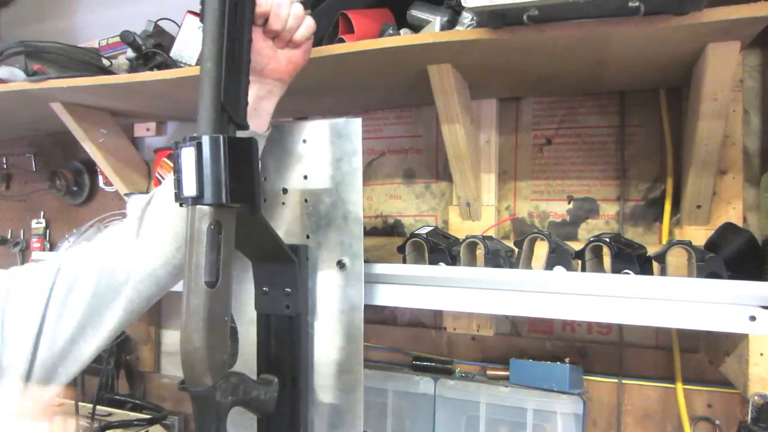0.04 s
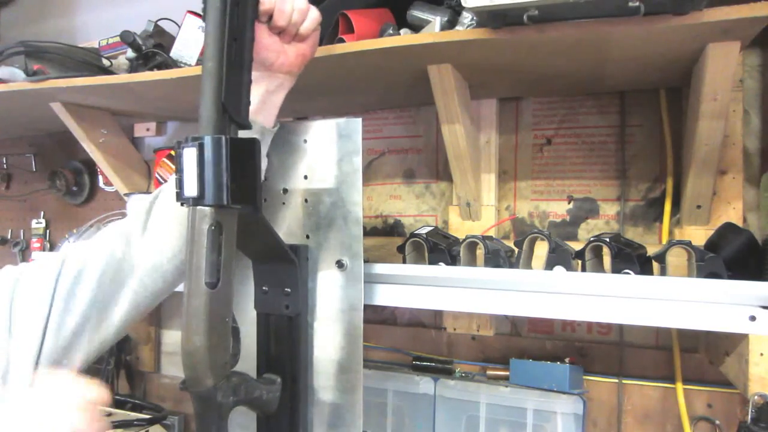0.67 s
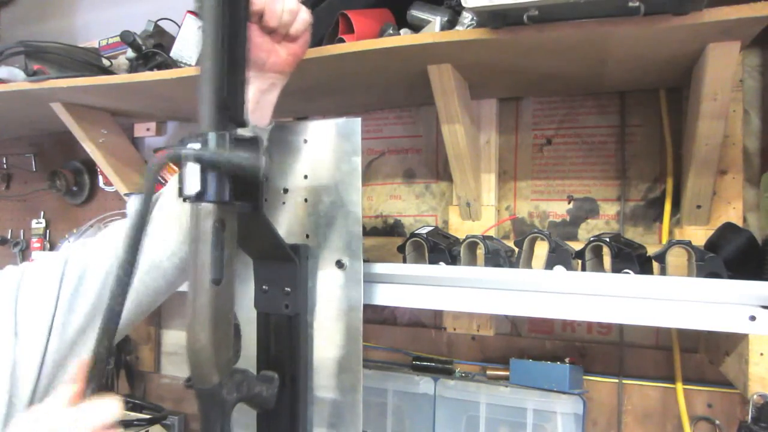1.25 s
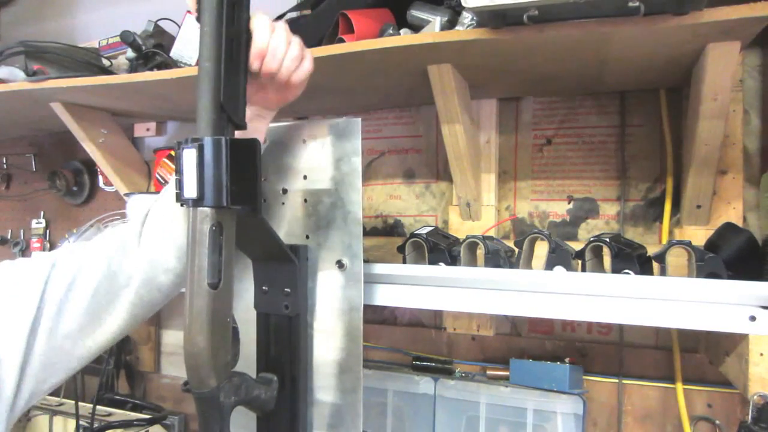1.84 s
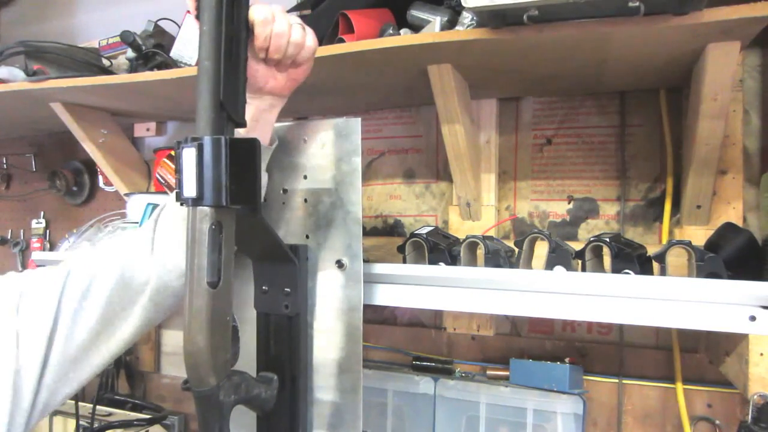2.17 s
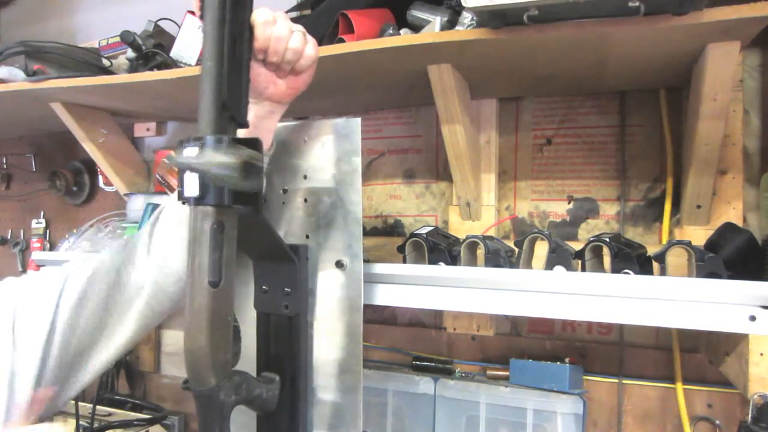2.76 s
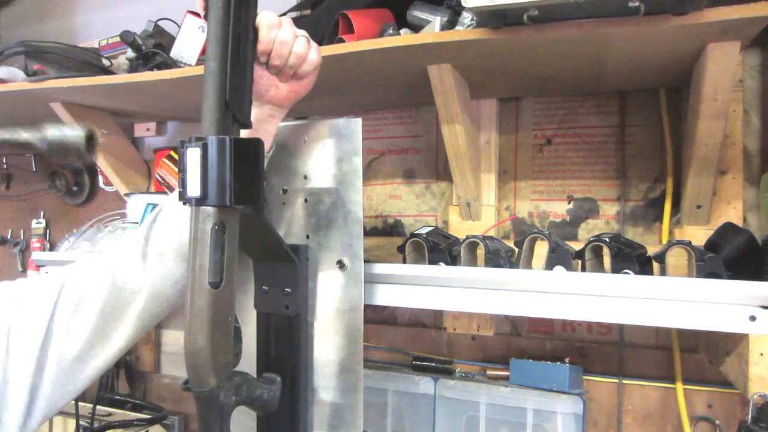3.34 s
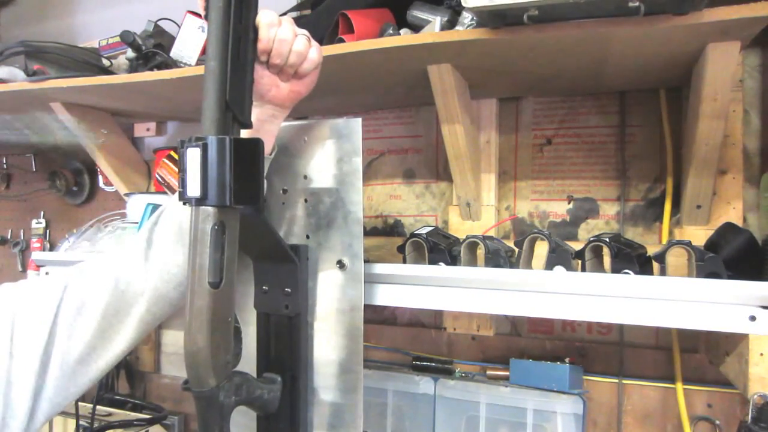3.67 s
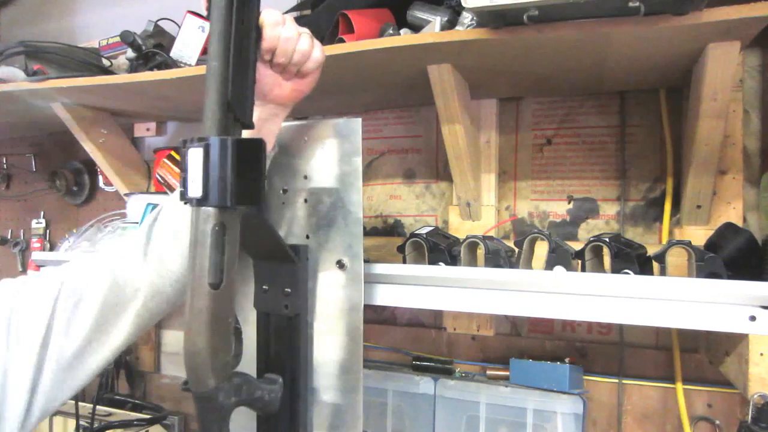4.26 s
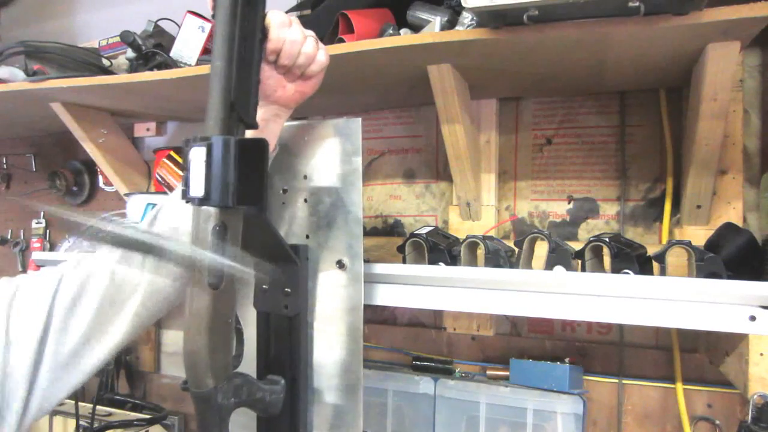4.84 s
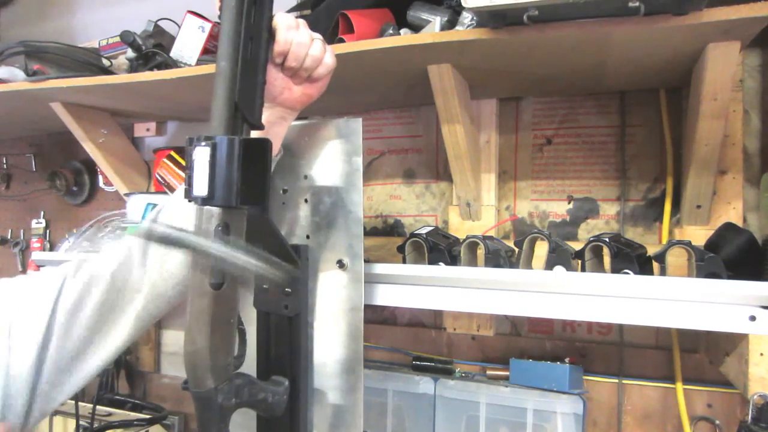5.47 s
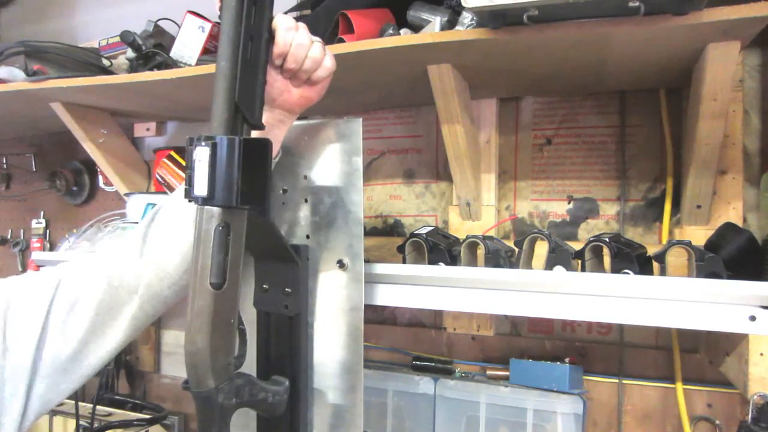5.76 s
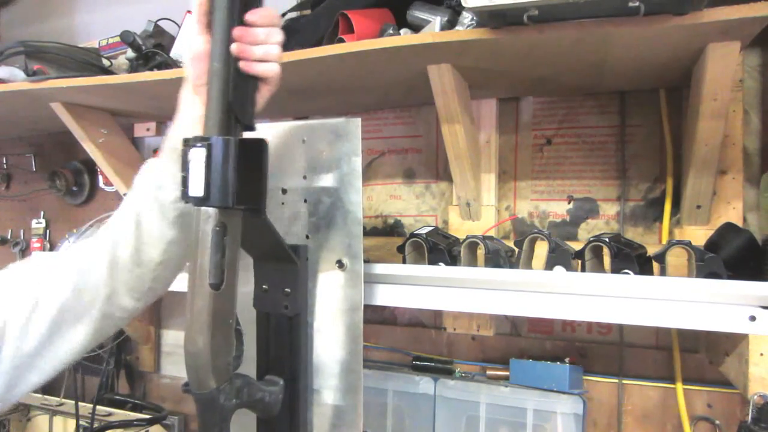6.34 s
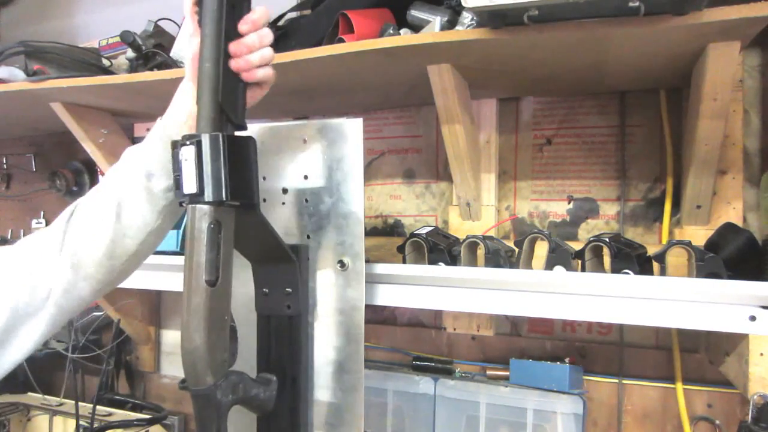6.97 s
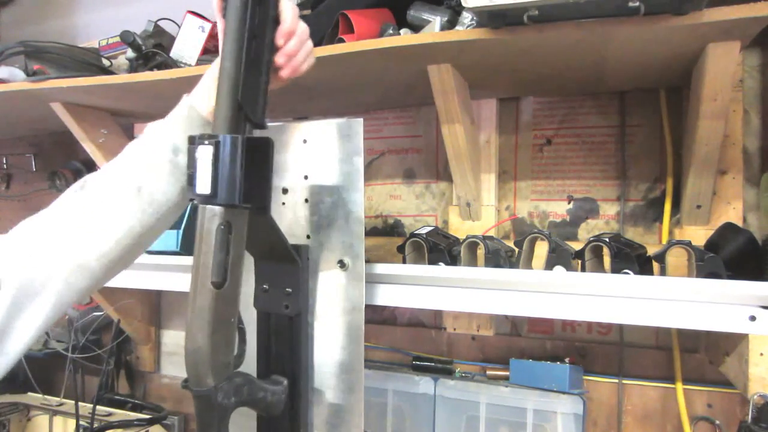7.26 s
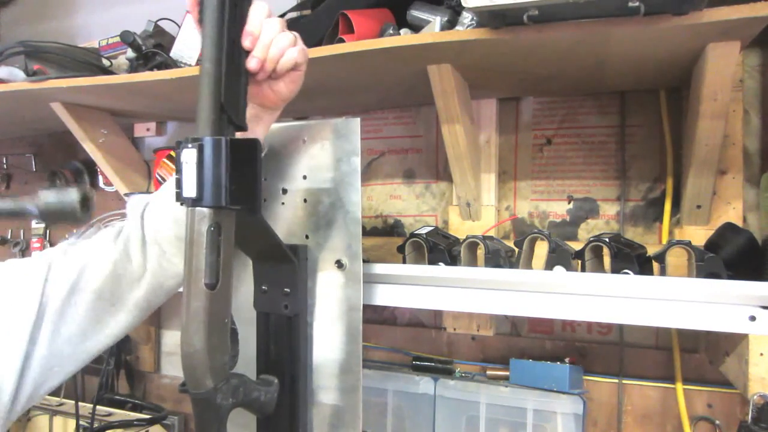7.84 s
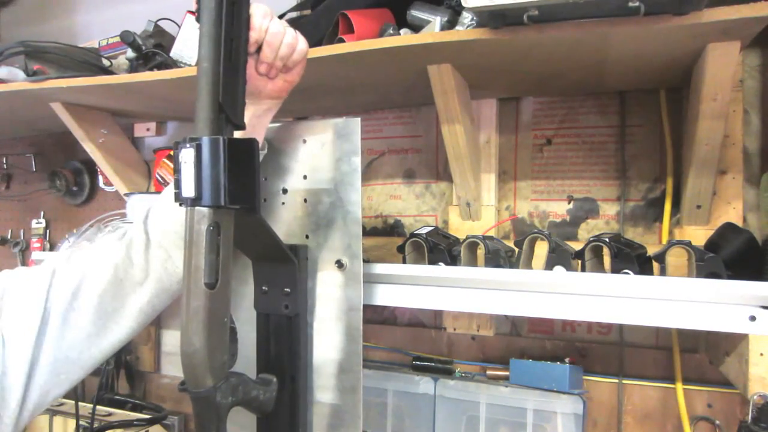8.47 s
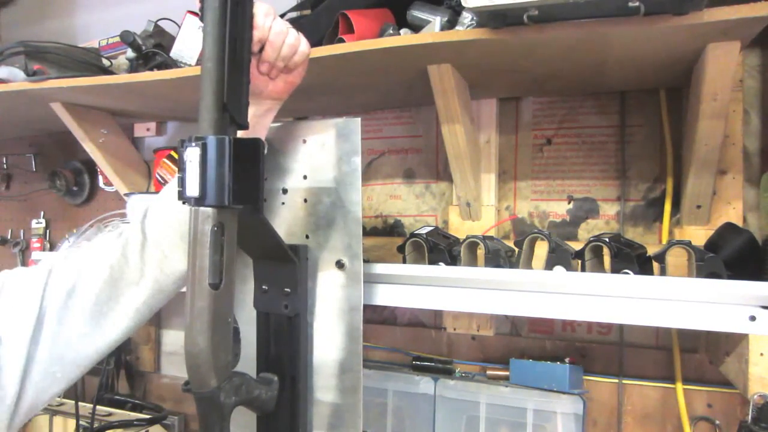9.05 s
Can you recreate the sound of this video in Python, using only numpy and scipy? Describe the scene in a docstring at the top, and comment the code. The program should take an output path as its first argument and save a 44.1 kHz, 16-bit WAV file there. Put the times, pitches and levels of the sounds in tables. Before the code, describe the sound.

A steel bar strikes a metal lock on a gun eight times, with sharp clangs, rattles and quiet handling in a small workshop.

```python
"""Hammering a gun lock

A steel bar strikes a lock clamped round a gun, eight times, close to a camera in a small workshop.
Each blow cracks, clangs through lock and mount and shakes the wall; then the gun chatters in its clamp.
A hand shifts its grip between blows, and a fan hums. The camera's automatic volume control turns
everything down at loud blows and lets the room's hum creep back."""
import sys
import numpy as np
from scipy import signal
from scipy.fft import rfft, irfft
from scipy.io import wavfile
from scipy.ndimage import uniform_filter1d, minimum_filter1d

SR = 44100
rng = np.random.default_rng(int(sys.argv[2]) if len(sys.argv) > 2 else 0)


def transcribe(u):
    """Save the signal u as a 16-bit wav file named by the first command-line argument.

    u: samples, shape (n,) or (channels, n), limited to [-1, 1]; the rate is SR.
    q: integer samples, one column per channel.
    """
    v = np.clip(np.atleast_2d(u).T, -1, 1)
    q = np.round(v * 32767).astype(np.int16)
    wavfile.write(sys.argv[1], SR, q)


N = 406161
T = np.arange(SR) / SR  # one second of time, for each short sound

# A TONE table gives the balance of low and high pitches. fade_s is the time to die away by 60 dB.
# blows of the bar: start_s, force_db, thud_db, body_db, chatter_db, rebound_after_s, rebound_db
BAR_BLOWS = [(-0.019, 3.5, 4, 2, -2.5, .014, -8), (0.5754, -0.8, 2, 4, 2, .012, -7),
             (1.1698, -1.3, 8.5, 1.5, 2.5, .017, -1), (2.5456, -1.5, 1.5, 3.5, -4, .012, -5),
             (4.0439, -1.2, 5, -3.5, -8.5, .014, -13), (4.5855, -1.5, 3, 3, -1, .017, -9),
             (5.2122, -1.3, 2.5, 0, -1.2, .016, -9), (8.6998, 0.5, -7, 1, -4, .010, -3)]
# splash of noise as the bar meets the lock: pitch_hz, level_db
CRACK_TONE = [(60, -16), (300, -16), (1000, -9.5), (1500, -5), (2000, -8), (2800, -5), (3500, -12.5),
              (4700, -8.5), (5500, -20), (6300, -8), (7800, -7.5), (9800, -16), (12000, -34)]
# stiff, short-lived notes of that first contact: pitch_hz, level_db, fade_s
CRACK_NOTES = [(527, -12.5, .05), (1573, 1, 0.032), (2510, -8, 0.036)]
# dense ring of gun, mount and bench: pitch_hz, level_db
CLANG_TONE = [(30, -15), (110, -13.5), (280, -5), (480, -1.5), (900, -0.5), (1250, -1), (1550, 1),
              (2100, -4.5), (2600, -3.5), (3600, -8), (7500, -9), (9500, -15.5), (11000, -30.5),
              (12000, -31.5)]
# how long that ring lasts: pitch_hz, fade_s
CLANG_FADES = [(60, .25), (500, 0.23), (1500, .2), (4000, .2), (11000, 0.14)]
# strongest notes of lock and mount: pitch_hz, level_db
STEEL_NOTES = [(451, -3), (482, -5), (581, -2.5), (749, -5), (842, -5), (898, -0.5), (973, -6.5),
               (1015, -6.5), (1189, -5), (1422, 2), (1478, -1), (1547, -2.5), (1595, -2), (1655, -4.5),
               (1715, -2), (1895, -5.5), (2138, -7.5), (2445, -4.5), (2475, -2), (2623, -5), (3007, -5),
               (3455, -8.5), (5200, -10), (6110, -10)]
# faint, lasting ring of the bar: pitch_hz, level_db, fade_s
BAR_NOTES = [(1830, 0, 1.6), (3540, -3, 1.2), (5373, -7, 0.83), (6815, -9.5, 0.79), (7100, -9, 0.9),
             (8511, -12.5, 1.6), (9100, -12, 1.1), (11280, -10.5, .6)]
# the wall shaken through the mount: pitch_hz, level_db
THUD_TONE = [(15, -8.5), (35, -0.5), (65, 0), (110, -3.5), (200, -6), (300, -17), (800, -40), (3000, -70.5)]
# the workshop's echo: pitch_hz, level_db
ECHO_TONE = [(30, -13), (100, -13.5), (200, -3), (300, -9), (1200, -7.5), (1600, 0.5), (2700, 1.5),
             (4200, -6.5), (6500, -5), (10000, -13), (12000, -30)]
# how long that echo lasts: pitch_hz, fade_s
ECHO_FADES = [(50, 1), (190, 0.58), (350, 0.39), (1000, 0.17), (3000, 0.43), (7000, 0.37), (11000, .31)]
# the gun chattering in its clamp: pitch_hz, level_db
CHATTER_TONE = [(100, -20), (450, -10.5), (850, -6), (1230, -14), (1450, 1.5), (1750, -1), (2100, -4),
                (2480, -2), (3300, -10.5), (6000, -11), (8000, -13.5), (9800, -17.5), (11200, -30),
                (12000, -33)]
# the hand knocks on the gun: start_s, level_db, pitch_hz
HAND_KNOCKS = [(1.556, -44, 1280), (6.213, -44.5, 1250), (6.315, -30.5, 900), (6.385, -38, 780),
               (6.417, -36, 800), (6.848, -34, 620), (7.17, -39.5, 850)]
# loose metal parts click: start_s, level_db, pitch_hz
METAL_CLICKS = [(0.528, -51, 3500), (2.035, -38.5, 3400), (4.915, -49, 3500), (6.314, -41, 2900),
                (6.414, -42, 6500), (7.06, -42.5, 4000), (7.089, -45, 6000), (7.204, -41, 3000),
                (7.352, -45.5, 2800), (7.515, -55, 6400), (7.921, -53, 2300)]
# the gun's weight bumps the mount against the wall: start_s, level_db
WALL_BUMPS = [(0.128, -24), (6.392, -37), (6.86, -43), (7.421, -43)]
# the mount creaks: start_s, length_s, pitch_hz, level_db
MOUNT_CREAKS = [(2.739, 0.034, 500, -35), (2.771, 0.029, 420, -36), (4.238, 0.034, 955, -50),
                (5.398, .04, 476, -36.5)]
# strokes of the hand along the gun: middle_s, length_s, level_db
HAND_STROKES = [(1.6, .4, -64), (3.3, 1.4, -68), (6.40, .16, -45.5), (7.14, .34, -54.5), (7.48, .4, -64)]
# skin and sleeve rubbing on the gun: pitch_hz, level_db
RUB_TONE = [(100, -6), (400, -3), (900, 3.5), (2000, 4.5), (4000, -2), (8000, -4), (10000, -14.5),
            (12000, -24)]
# the fan's hum: pitch_hz, level_db
HUM_NOTES = [(70, -55.5), (150, -58.5), (333, -62), (657, -66), (845, -69), (1039, -72), (1357, -71)]
# the fan's steady rush of air: pitch_hz, level_db
AIR_TONE = [(15, -7), (45, -9), (100, -8.5), (140, -3.5), (250, -3), (325, 6.5), (380, -4.5), (560, -1),
            (760, -7), (1350, -9), (2100, -13), (4000, -28.5), (7500, -35.5), (11500, -49)]


def hammering(spring_s=.0655, spring_s_per_db=.0009):
    """All the blows. The harder the gun springs back, the later it meets its clamp."""
    out = np.zeros(N)
    for start_s, force_db, thud_db, body_db, chatter_db, rebound_after_s, rebound_db in BAR_BLOWS:
        strike = blow(thud_db, body_db)
        rattle = amp(chatter_db) * chatter(spring_s + spring_s_per_db * chatter_db)
        add(out, start_s, amp(force_db) * (strike + rattle))
        add(out, start_s + rebound_after_s, amp(force_db + rebound_db) * rebound())
    return out


def blow(thud_db, body_db):
    """One blow: a crack, then a clang that spreads through the mount into wall and room."""
    clang = amp(-2) * fade_by_pitch(noise(CLANG_TONE), CLANG_FADES) * onset(.0016) * flicker(1.5)
    notes = amp(-3.5) * steel_ring(lowest_hz=295, scatter_db=3) * onset(.0012) * fade(.165)
    thud = amp(thud_db - 16.5) * noise(THUD_TONE) * onset(.002) * (fade(.17) + amp(-21.5) * fade(.9))
    echo = amp(-10.5) * fade_by_pitch(noise(ECHO_TONE), ECHO_FADES) * onset(.015) * flicker(.7)
    bar = sum(amp(db + rng.normal(0, 2)) * sine(hz) * fade(fade_s) for hz, db, fade_s in BAR_NOTES)
    ring = crack() + clang + notes + echo + amp(-55) * bar
    # body_db turns the lower pitches up or down
    tilt_db = np.interp(np.fft.rfftfreq(len(T), 1 / SR), [600, 1400], [body_db, 0])
    ring = irfft(rfft(ring) * amp(tilt_db), len(T))
    soft_end = np.minimum(1, 2 * (1 - T)) ** 2
    return (ring + thud) * soft_end


def crack():
    """Steel meets steel: the lock is pushed off sharply and rings for an instant."""
    push = sum(amp(db) * np.sin(2 * np.pi * hz * rng.uniform(.99, 1.02) * T) * fade(fade_s)
               for hz, db, fade_s in CRACK_NOTES)
    splash = amp(1) * noise(CRACK_TONE) * fade(.035)
    return (amp(3.5) * push + splash) * onset(.00061)


def steel_ring(lowest_hz, scatter_db):
    """Lock and mount ring at their own notes; each contact shifts the levels and pitches a little."""
    ring = np.zeros(len(T))
    for hz, db in STEEL_NOTES:
        note = amp(db + rng.normal(0, scatter_db)) * sine(hz * rng.normal(1, .004))
        ring += note / (1 + (lowest_hz / hz) ** 4)  # weakens notes below lowest_hz
    return unit_level(ring)


def rebound():
    """The bar lands again as it skids off the lock."""
    return amp(-7) * crack() + noise(CLANG_TONE) * onset(.001) * fade(.045)


def chatter(delay_s):
    """The gun springs back against its clamp: a buzz of contacts that swells and dies."""
    rise = np.exp(-((T - delay_s) / .016) ** 2)
    fall = fade(.21, np.maximum(T - delay_s - .014, 0))
    swell = np.where(T < delay_s, rise, fall) * flicker(1.6)
    buzz = amp(-10.5) * noise(CHATTER_TONE)
    ring = amp(-16) * steel_ring(lowest_hz=1000, scatter_db=4)
    return swell * (buzz + ring)


def taps(rows, width_octaves, fade_s):
    """Small contacts on the gun: each rings briefly round its pitch, with a little echo after it."""
    out, grid_hz = np.zeros(N), np.geomspace(20, 16000, 40)
    treble_cut_db = 10 * np.log10(1 + (grid_hz / 9500) ** 16)
    decay = fade(fade_s) + amp(-24) * fade(.13)
    for start_s, db, hz in rows:
        hump_db = -14 * np.log10(1 + (np.log2(grid_hz / hz) / width_octaves) ** 4)
        ring = noise(np.c_[grid_hz, hump_db - treble_cut_db])
        add(out, start_s, amp(db) * ring * onset(.00062) * decay)
    return out


def mount_settling():
    """The mount bumps the wall and creaks as it settles."""
    out = np.zeros(N)
    for start_s, db in WALL_BUMPS:
        add(out, start_s, amp(db) * noise(THUD_TONE) * onset(.004) * fade(.35))
    for start_s, length_s, hz, db in MOUNT_CREAKS:
        creak = sine(hz) + .66 * noise([(100, -20), (hz, 0), (3000, -30), (12000, -70)])
        swell = np.exp(-(2 * T / length_s - 1) ** 2)
        add(out, start_s, amp(db) * unit_level(creak) * swell)
    return out


def hand_rubbing(grains_per_s=6000, ends_db=-15, sleeve_db=-73):
    """Skin rubs on the gun in grainy strokes that swell and die away; a sleeve rustles all the time."""
    t = np.arange(N) / SR
    grains = rng.standard_normal(N) * (rng.random(N) < grains_per_s / SR)
    strokes = sum(amp(db + ends_db * abs(t - middle_s) / (length_s / 2))
                  for middle_s, length_s, db in HAND_STROKES)
    return shape_tone(grains, RUB_TONE) * np.hypot(strokes, amp(sleeve_db))


def fan(air_db=-48):
    """A fan's rush of air and its hum; the higher notes waver more."""
    t = np.arange(N) / SR
    hum = np.zeros(N)
    for hz, db in HUM_NOTES:
        waver = shape_tone(rng.standard_normal(N), [(1, 0), (4, -8), (30, -60), (200, -120)])
        hum += amp(db) * np.sqrt(2) * np.sin(2 * np.pi * hz * t + min(hz / 450, 1.2) * waver)
    return amp(air_db) * shape_tone(rng.standard_normal(N), AIR_TONE) + hum


def flicker(depth_db):
    """A level that jumps about within a few milliseconds, as loose parts meet and part."""
    wobble = uniform_filter1d(uniform_filter1d(rng.standard_normal(len(T)), size=170), size=110)
    return unit_level(amp(depth_db * unit_level(wobble)))


def noise(tone):
    """One second of noise with the given tone, like countless notes ringing at once."""
    return shape_tone(rng.choice([-1., 1.], len(T)), tone)


def sine(hz):
    """One second of a pure note, starting anywhere in its cycle."""
    return np.sin(2 * np.pi * (hz * T + rng.random()))


def onset(rise_s):
    """A smooth start."""
    return 1 - np.exp(-(T / rise_s) ** 2)


def fade(fade_s, t=T):
    """A level that drops by 60 dB every fade_s seconds."""
    return np.exp(-np.log(1000) * t / np.maximum(fade_s, 1e-3))


def fade_by_pitch(sound, fades):
    """Lets each pitch die away at its own speed."""
    hz, t, bands = signal.stft(sound, SR, nperseg=256)
    bands = bands * fade(look_up(fades, hz)[:, None], t)
    return signal.istft(bands, SR, nperseg=256)[1][:len(sound)]


def shape_tone(sound, tone):
    """Gives a sound the balance of pitches in a tone table, at an average level of 1."""
    gains = amp(look_up(tone, np.fft.rfftfreq(len(sound), 1 / SR)))
    return unit_level(irfft(rfft(sound) * gains, len(sound)))


def look_up(table, hz):
    """Reads a table at any pitch, sliding between its rows."""
    row_hz, values = np.transpose(table)
    return np.interp(np.log(hz + 1), np.log(row_hz + 1), values)


def unit_level(sound):
    """Scales a sound to an average (root mean square) level of 1."""
    return sound / np.sqrt(np.mean(sound ** 2) + 1e-20)


def amp(db):
    """Turns decibels into a multiplier."""
    return 10 ** (np.asarray(db) / 20)


def add(mix, start_s, sound):
    """Mixes a sound in at start_s, dropping whatever falls outside the mix."""
    start = round(start_s * SR)
    part, sound = mix[max(start, 0):], sound[max(-start, 0):]
    part[:len(sound)] += sound[:len(part)]


def scene():
    """Hammering, handling and fan, the same in both channels."""
    knocks = taps(HAND_KNOCKS, width_octaves=.65, fade_s=.11)
    clicks = taps(METAL_CLICKS, width_octaves=1, fade_s=.04)
    handling = knocks + clicks + mount_settling() + hand_rubbing()
    return np.tile(hammering() + handling + fan(), (2, 1))


def record(dry, threshold_db=-15, hold_s=.4, recovery_db_per_s=3.5, opening_cut_db=14):
    """The camera turns loud moments down, waits, and recovers slowly; it also tames peaks and treble."""
    t = np.arange(N) / SR
    power = signal.lfilter([1 / 800], [1, 1 / 800 - 1], (dry ** 2).mean(0))  # running average
    excess_db = np.maximum(10 * np.log10(power + 1e-12) - threshold_db, 0)
    excess_db[0] = opening_cut_db  # the volume starts low, in the midst of the hammering
    hold = round(hold_s * SR)
    held_db = -minimum_filter1d(-excess_db, size=hold, origin=(hold - 1) // 2, mode="nearest")
    recovery_db = t * recovery_db_per_s
    cut_db = np.maximum.accumulate(held_db + recovery_db) - recovery_db
    turned_down = dry / amp(cut_db)
    peak_gain = .97 / np.maximum(abs(turned_down).max(0), .97)
    limited = turned_down * uniform_filter1d(minimum_filter1d(peak_gain, size=41), size=41)
    whine = amp(-88) * np.sin(2 * np.pi * 12000 * t)  # the camera's own electronics
    treble_cut = signal.firwin(255, cutoff=12200, window=("kaiser", 8), fs=SR)
    return signal.oaconvolve(limited + whine, treble_cut[None], "same")


dry = scene()
out = record(dry)
transcribe(out)
```